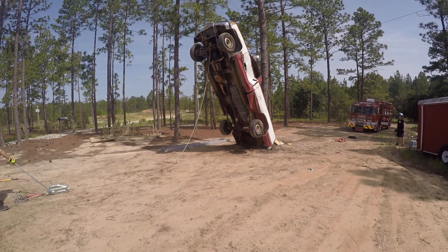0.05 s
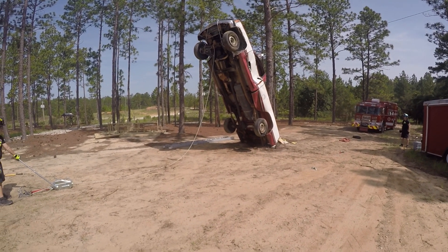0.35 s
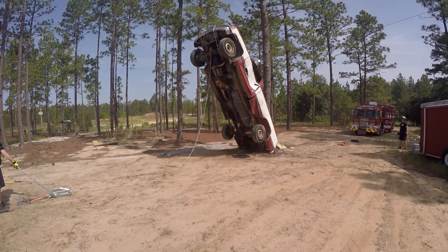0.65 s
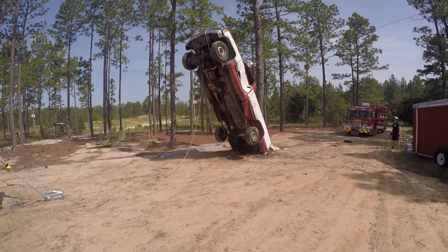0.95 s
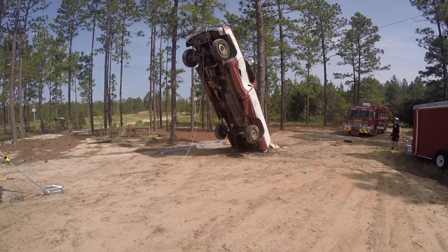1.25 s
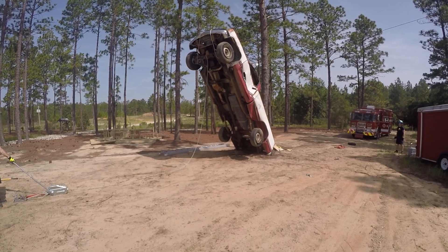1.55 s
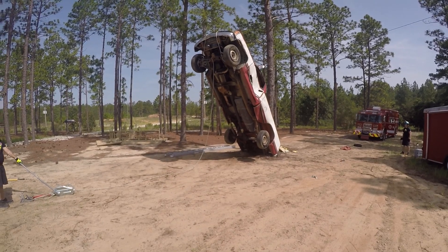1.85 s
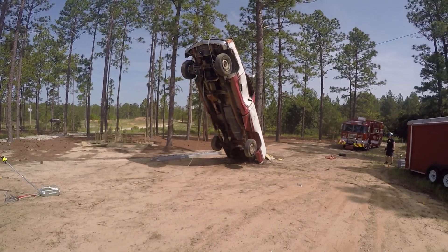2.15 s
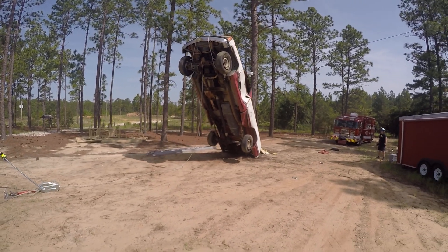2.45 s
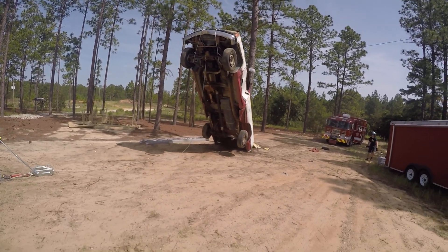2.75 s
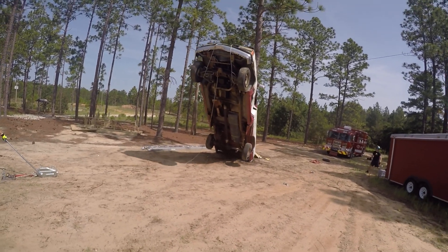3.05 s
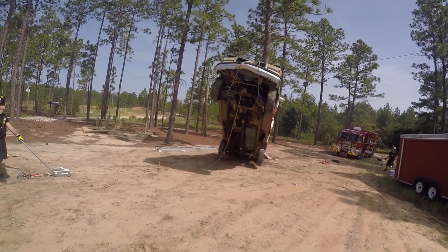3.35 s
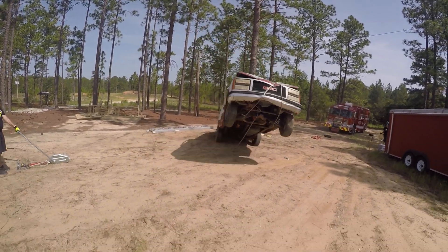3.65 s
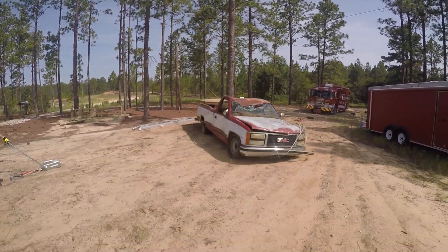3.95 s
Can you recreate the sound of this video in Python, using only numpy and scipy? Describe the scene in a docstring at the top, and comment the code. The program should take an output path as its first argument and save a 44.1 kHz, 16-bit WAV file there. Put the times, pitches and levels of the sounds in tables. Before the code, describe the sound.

A pickup tips over and crashes onto its wheels with tyre thuds and crumpling, ringing metal. Before that, small gear clicks and sandy footsteps sound close to the microphone, over low engine and breeze rumble in a forest clearing.

```python
"""A pickup standing on its tail tips over and crashes onto its wheels, heard from one spot in a clearing.
Its tyres thud, the steel body crumples and the panels ring. Before that, close to the microphone,
camera gear clicks and feet crunch and drag back through the sand; the trees scatter steps and crash.
Underneath, an engine and the breeze rumble, the microphone takes soft bumps, insects buzz in the pines."""
import sys
import numpy as np
from scipy import signal
from scipy.fft import rfft, irfft
from scipy.io import wavfile

SR = 44100
rng = np.random.default_rng(int(sys.argv[2]) if len(sys.argv) > 2 else 0)


def digitize_waveform(pressure):
    """Quantize a signal to 16-bit integers and store it at the path in sys.argv[1].

    Rows of a 2-D input are taken as channels; values are limited to [-1, 1].
    """
    field = np.atleast_2d(pressure).T
    bounded = np.clip(field, -1, 1)
    quanta = np.round(bounded * 32767).astype(np.int16)
    wavfile.write(sys.argv[1], SR, quanta)


N = 176400

# blows of the landing (time [s], relative level [dB], brightness [Hz])
BLOWS = [(3.893, -25, 600), (3.9036, -27, 1120), (3.914, -26.5, 2520), (3.919, -21.5, 8000),
         (3.932, -20, 5100), (3.948, -12.5, 3800), (3.955, -12, 11000), (3.974, -17.5, 6500),
         (3.985, -17, 7500)]
# spectrum of the crumpling steel body (frequency [Hz], level [dB])
CRUMPLE_SPECTRUM = [(100, -4.5), (170, -1), (250, -2.5), (430, -13.5), (660, -12), (800, -3), (1050, -4.5),
                    (1650, -13), (2050, -7), (2450, -5), (2850, -20), (3300, -15), (4600, -16), (6100, -18),
                    (7200, -30), (8300, -23.5), (9000, -32), (12600, -36), (15000, -49)]
# ringing panels and frame (frequency [Hz], level [dB], t60 [s])
PANEL_MODES = [(754, 0.5, 0.35), (829, 0.5, 0.22), (936, 5.5, 0.35), (1021, -2, 0.4), (1448, -4.5, 0.21),
               (2095, -11, 0.17), (2135, -11, 0.22), (2470, 3, 0.17), (2860, -9, 0.27), (3250, -2.5, 0.11),
               (3950, -11, 0.088), (4490, -3.5, 0.091), (5430, -21, .12), (5850, -8, 0.061)]
# tyres and chassis hitting the ground (time [s], level [dB], pitch [Hz])
THUDS = [(3.868, -19.5, 32.4), (3.893, -37, 248), (3.915, -16.5, 73), (3.942, -13, 46),
         (3.956, -18.5, 215.6), (3.971, -11, 96)]
# steps near the microphone (time [s], level [dB], attack [s], decay [s], brightness [Hz])
STEPS = [(2.894, -43.5, 0.0079, 0.024, 5000), (3.02, -47, 0.0065, .04, 5000),
         (3.147, -47, 0.0099, 0.016, 3500), (3.217, -39, .004, 0.05, 11000),
         (3.242, -31.5, 0.0078, 0.017, 11000), (3.262, -36, 0.0033, 0.015, 3440),
         (3.6, -38.5, .007, 0.025, 8000), (3.623, -46, 0.0091, .025, 9200)]
# spectrum of sand crunching underfoot (frequency [Hz], level [dB])
CRUNCH_SPECTRUM = [(88, -40), (150, 4.5), (378, -6.5), (687, -11.5), (787, -15.5), (1050, -2), (1350, -12),
                   (2060, -19.5), (2550, -10), (3090, -20.5), (3820, -16), (4910, -24.5), (5400, -15.5),
                   (6550, -25), (7790, -22), (8750, -34.5), (15000, -44)]
# hollow ring of the steps (frequency [Hz], level [dB], t60 [s])
STEP_MODES = [(574, 4, .08), (1014, 1, 0.041), (1165, -6, .05), (1430, -9, 0.059), (2240, 2, .06),
              (2497, 3, 0.047), (3970, -8, 0.042), (5940, -2.5, 0.027)]
# soles dragging through loose sand (time [s], level [dB], attack [s], decay [s])
DRAGS = [(0., -54, 0.056, 0.15), (0.127, -47.5, 0.012, 0.03), (1.59, -53, 0.025, 0.026),
         (1.855, -48.5, 0.027, 0.039), (2.055, -55, .01, .025), (2.66, -58.5, .015, 0.18),
         (2.9, -53.5, .02, 0.12), (3.025, -55, 0.011, 0.11), (3.155, -47, 0.017, 0.023),
         (3.258, -37.5, 0.011, 0.027), (3.292, -42.5, 0.012, .03), (3.37, -48.5, 0.093, 0.12),
         (3.609, -47.5, 0.012, .07), (3.728, -50, 0.014, 0.061), (3.825, -51.5, 0.013, 0.077)]
# spectrum of sand pushed aside (frequency [Hz], level [dB])
DRAG_SPECTRUM = [(180, 3), (280, 1.5), (430, -4.5), (600, -2.5), (820, -6), (1060, 3), (1400, -14.5),
                 (1800, -6.5), (2400, -9.5), (2900, -21.5), (4000, -20.5), (7000, -35)]
# clicks of camera gear near the microphone (time [s], level [dB], low cut [Hz])
GEAR_CLICKS = [(1.3114, -55.5, 900), (1.6995, -49, 1500), (1.945, -49, 2200), (2.056, -52.5, 900),
               (2.4269, -51, 1800), (2.442, -55, 1500), (2.4942, -56, 2000), (2.6594, -47.5, 1500),
               (3.0831, -49, 1000), (3.1507, -50, 2000), (3.361, -50, 3000), (3.4638, -31, 610),
               (3.754, -48.5, 1500), (3.792, -50.5, 1180), (3.855, -36.5, 2420)]
# spectrum of a click's dry crack (frequency [Hz], level [dB])
CRACK_SPECTRUM = [(350, -37), (600, -2), (1330, 0.5), (3410, -10.5), (4010, -5), (4840, -12), (6000, -6.5),
                  (8070, -18.5), (8750, -31), (11600, -30), (15000, -44)]
# resonances of the camera case (frequency [Hz], level [dB], t60 [s])
CASE_MODES = [(1130, -2, 0.05), (1430, -7.5, 0.03), (2174, -6, 0.073), (2496, 3, 0.082), (3130, -7, 0.028),
              (3940, -0.5, .045), (5250, -10, 0.032), (7800, -10, 0.027)]
# soft bumps on the microphone (time [s], level [dB], pitch [Hz])
MIC_BUMPS = [(.665, -29.5, 60), (.785, -27, 109), (.927, -36.5, 115.9), (1.125, -26, 82), (1.958, -28, 104),
             (2.373, -23.5, 60.7), (3.075, -24, 67.5), (3.19, -33, 120), (3.24, -15.5, 27.9),
             (3.43, -29.5, 70.6), (3.575, -31, 116), (3.735, -32.5, 113.5)]
# spectrum of engine and breeze (frequency [Hz], level [dB])
RUMBLE_SPECTRUM = [(18, 2), (28, 2), (52, 2), (76, -5), (105, -7.5), (130, -17), (165, -27.5), (250, -32),
                   (330, -50)]
# rise and fall of that rumble (time [s], relative level [dB])
RUMBLE_LEVELS = [(0.0, -41.5), (0.1, -37), (1.22, -36.5), (1.44, -40), (2.44, -34), (2.99, -40),
                 (3.07, -36.5), (3.28, -33), (3.48, -36), (3.85, -34)]
# insect calls (start [s], end [s], pitch [Hz], level [dB])
INSECT_CALLS = [(.1, 3, 4535, -78), (.36, 0.95, 5640, -69), (.45, 1.3, 6700, -78), (1.3, 1.53, 5400, -69),
                (1.53, 1.85, 5660, -68), (2.6, 3.5, 5770, -72)]
# spectrum of the hiss in the pines (frequency [Hz], level [dB])
PINE_SPECTRUM = [(150, -13), (250, -2.5), (404, -6.5), (471, -9), (664, -7), (1020, -2.5), (1230, -7),
                 (1670, -4), (2320, -12.5), (2530, -12), (3000, -14), (5010, -14), (5550, -11), (6050, -15),
                 (6820, -20), (7180, -23), (15000, -32)]

CRUMPLE_DB, PANEL_DB, STEP_RING_DB = -4.5, -6, -8.5
RUMBLE_TRIM_DB, PINES_DB, ECHO_DB = -0.5, -57, -17


def body_crash():
    """The pickup lands: each blow sets off a rattle that crumples the body and rings its panels."""
    rattle = grains(per_s=9000, spread_db=2)
    crumple = colour(rattle, CRUMPLE_SPECTRUM)
    crush, force = 0, 0
    for start, db, bright_hz in BLOWS:
        push = undb(db) * swell(start, attack=0.0029, decay=0.022)
        crush += butter(push * crumple, 2 * bright_hz, "low")
        force += butter(push * rattle, bright_hz, "low")
    return undb(CRUMPLE_DB) * crush + undb(PANEL_DB) * ring(force, PANEL_MODES)


def tyre_thuds():
    """Tyres and chassis hit the sandy ground in low, quickly damped thuds."""
    return thumps(THUDS, attack=0.0023, decay=0.03)


def footsteps():
    """Close to the microphone, sand grains crunch under each shoe with a hollow ring."""
    grit = grains(per_s=7000, spread_db=0.5)
    sand = colour(grit, CRUNCH_SPECTRUM)
    crunch, force = 0, 0
    for start, db, attack, decay, bright_hz in STEPS:
        press = undb(db) * swell(start, attack, decay)
        crunch += butter(press * sand, bright_hz, "low", order=1)
        force += butter(press * grit, bright_hz, "low", order=1)
    return crunch + undb(STEP_RING_DB) * ring(force, STEP_MODES)


def sole_drags():
    """Nearby soles push loose sand aside with a dull rustle."""
    press = sum(undb(db) * swell(start, attack, decay) for start, db, attack, decay in DRAGS)
    return press * colour(grains(per_s=2500, spread_db=1.5), DRAG_SPECTRUM)


def gear_clicks():
    """Small, dry clicks of camera gear near the microphone, each ringing briefly in the case."""
    chatter = grains(per_s=11000, spread_db=1.5)
    crack = colour(chatter, CRACK_SPECTRUM)
    out = 0
    for start, db, low_cut_hz in GEAR_CLICKS:
        tap = undb(db) * swell(start, attack=0.00073, decay=0.007)
        detuned = [(hz * rng.uniform(0.9653, 1.028), level, t60) for hz, level, t60 in CASE_MODES]
        out += butter(tap * crack + ring(tap * chatter, detuned), low_cut_hz, "high")
    return out


def squeal():
    """One faint, brief squeal among the clicks, half a second before the landing."""
    return whine(start=3.355, end=3.48, hz=1680, db=-55, width_hz=59, fade=0.03)


def clearing_echo(x):
    """Ground and trunks scatter a short, dull echo back to the microphone."""
    scatter = rng.standard_normal(N) * swell(0.0033, attack=0.024, decay=0.095)
    response = butter(scatter, 3800, "low")
    return undb(ECHO_DB) * signal.fftconvolve(x, response / np.linalg.norm(response))[:N]


def microphone_bumps():
    """Soft, low bumps right on the microphone."""
    return thumps(MIC_BUMPS, attack=0.0042, decay=0.016)


def engine_and_breeze():
    """Engine and breeze blend into one low rumble that swells and sinks."""
    times, levels = np.array(RUMBLE_LEVELS).T
    gain = undb(np.interp(np.arange(N) / SR, times, levels) + RUMBLE_TRIM_DB)
    return gain * colour(rng.standard_normal(N), RUMBLE_SPECTRUM)


def pines_and_insects():
    """Farther off, the pines hiss evenly and insects add thin buzzes."""
    hiss = undb(PINES_DB) * colour(rng.standard_normal(N), PINE_SPECTRUM)
    return hiss + sum(whine(*call, width_hz=110, fade=0.06) for call in INSECT_CALLS)


def undb(db):
    """Decibels to gain."""
    return 10 ** (np.asarray(db) / 20)


def unit(x):
    """Scale to rms 1."""
    return x / np.sqrt(np.mean(x ** 2))


def butter(x, hz, kind, order=2):
    """Butterworth filter."""
    return signal.sosfilt(signal.butter(order, min(hz, SR / 2 - 1), kind, fs=SR, output="sos"), x)


def colour(x, spectrum):
    """Shape a steady signal by (frequency [Hz], level [dB]) points, falling away outside them; rms 1."""
    hz, db = np.array(spectrum).T
    freqs = np.maximum(np.arange(N // 2 + 1) * SR / N, 1)
    gain = undb(np.interp(np.log(freqs), np.log(hz), db))
    skirts = np.minimum(freqs / hz[0], 1) ** 3 * np.minimum(hz[-1] / freqs, 1) ** 3
    return unit(irfft(rfft(x) * gain * skirts, N))


def grains(per_s, spread_db):
    """Dense tiny contacts of random size; rms 1."""
    size = undb(spread_db * np.minimum(rng.exponential(size=N), 4))
    hits = rng.random(N) < per_s / SR
    return unit(hits * size * rng.choice([-1, 1], N))


def swell(start, attack, decay):
    """Linear rise, exponential fall; times in seconds."""
    age = np.arange(N) / SR - start
    return np.clip(age / attack, 0, 1) * np.exp(-np.clip((age - attack) / decay, 0, 20))


def ring(force, modes):
    """Drive damped modes; white input keeps its power."""
    t = np.arange(SR // 4) / SR
    response = 0
    for hz, db, t60 in modes:
        envelope = undb(db) / np.sqrt(t60) * np.exp(-np.log(1000) * t / t60)
        response += envelope * np.sin(2 * np.pi * (hz * t + rng.random()))
    return signal.fftconvolve(force, response / np.linalg.norm(response))[:N]


def thumps(rows, attack, decay):
    """One heavily damped low swing for each row."""
    t = np.arange(N) / SR
    return sum(undb(db) * swell(start, attack, decay) * np.sin(2 * np.pi * hz * (t - start))
               for start, db, hz in rows)


def whine(start, end, hz, db, width_hz, fade):
    """A narrow unsteady tone that fades in and out."""
    t = np.arange(N) / SR
    waver = butter(rng.standard_normal(N), width_hz / 2, "low")
    tone = unit(waver * np.sin(2 * np.pi * hz * t))
    return undb(db) * tone * np.clip(np.minimum(t - start, end - t) / fade, 0, 1)


def scene():
    """Pickup, feet, gear and background at one microphone in the clearing."""
    crunches = body_crash() + footsteps() + sole_drags()
    foreground = crunches + tyre_thuds() + gear_clicks() + squeal()
    background = microphone_bumps() + engine_and_breeze() + pines_and_insects()
    return (foreground + clearing_echo(crunches) + background)[None]


def record(dry):
    """The camera's microphone input cuts the top treble steeply."""
    top_hz = 15280
    return signal.sosfilt(signal.ellip(10, .1, 80, top_hz, fs=SR, output="sos"), dry)


dry = scene()
out = record(dry)
digitize_waveform(out)
```